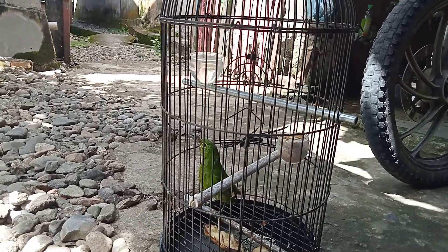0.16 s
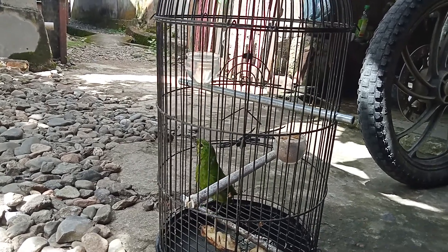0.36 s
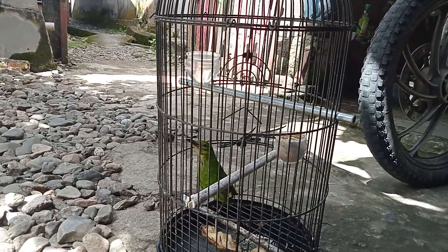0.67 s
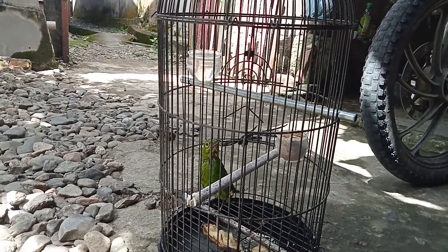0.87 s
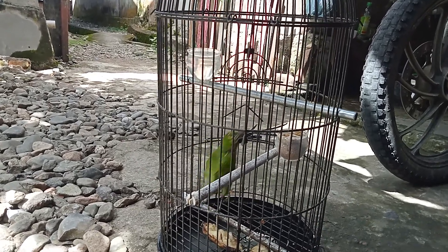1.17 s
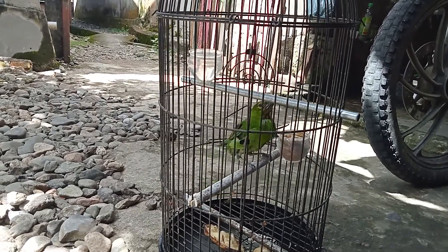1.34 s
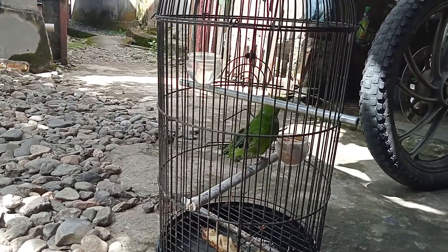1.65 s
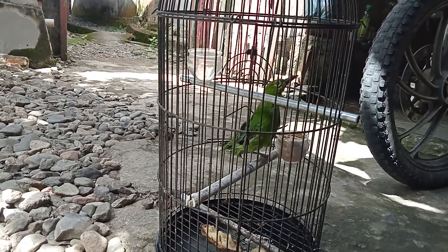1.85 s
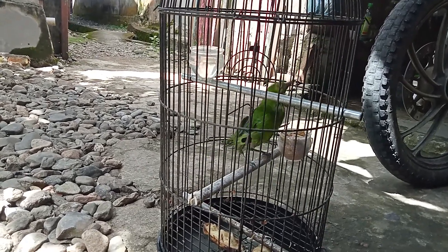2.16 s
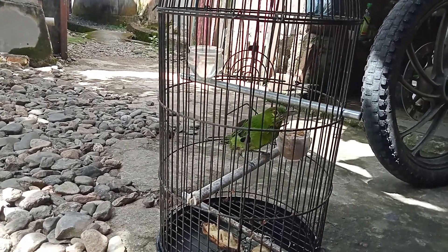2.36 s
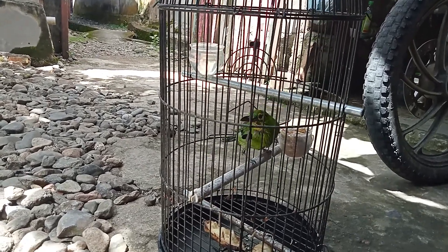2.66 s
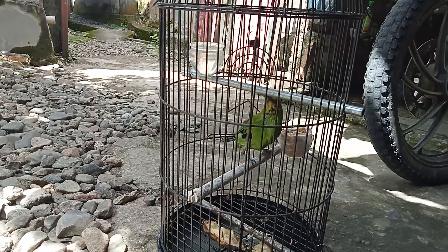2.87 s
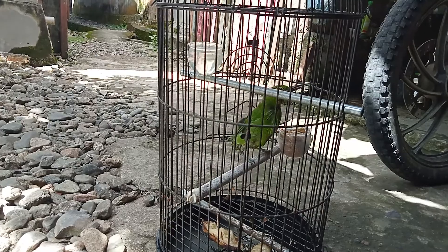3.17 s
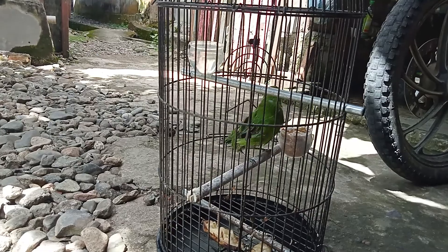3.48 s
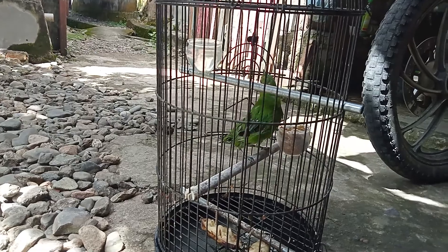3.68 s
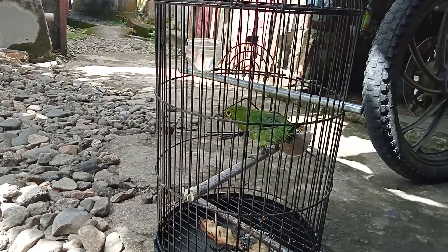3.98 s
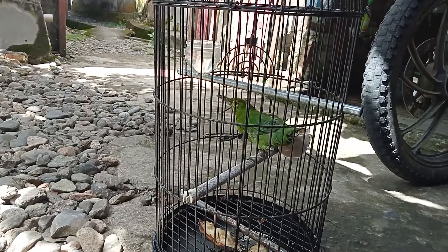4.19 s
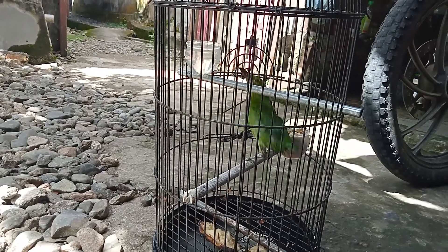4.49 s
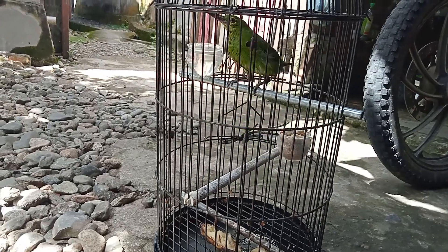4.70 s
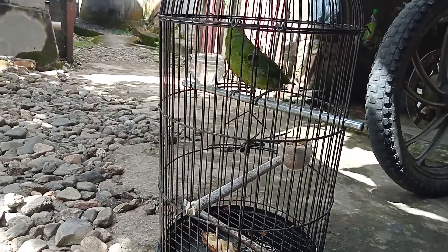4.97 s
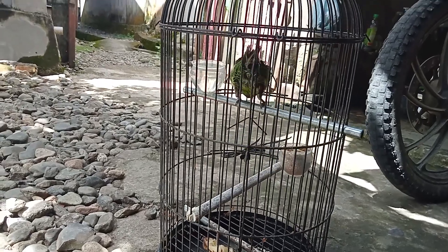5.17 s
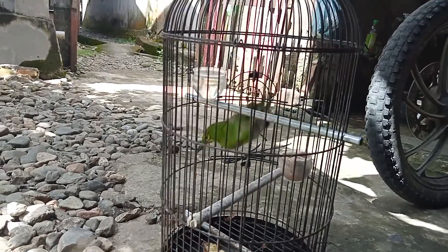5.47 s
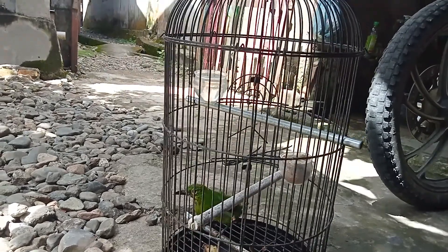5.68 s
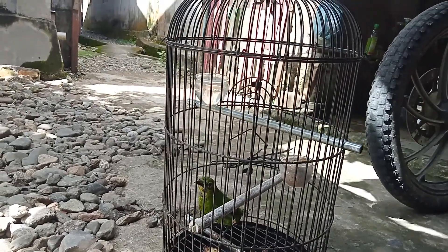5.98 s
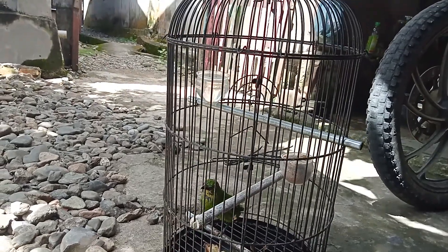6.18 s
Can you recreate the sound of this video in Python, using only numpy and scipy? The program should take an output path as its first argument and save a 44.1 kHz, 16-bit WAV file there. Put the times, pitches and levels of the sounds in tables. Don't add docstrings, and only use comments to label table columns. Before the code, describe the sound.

Bright, busy birdsong close to one microphone: whistles and hard falling chips first, a gap filled by a more distant bird's upward notes, then accelerating-sounding buzzes, thin climbing whistles, raspy notes and more sweet whistles, thinning at the end. Stones, walls and cage wires add a short shimmering echo. A soft steady outdoor wash, distant motor hum and high insect hiss stay far underneath.

```python
import sys
import numpy as np
from scipy import signal
from scipy.fft import rfft, irfft
from scipy.io import wavfile
from scipy.ndimage import uniform_filter1d, minimum_filter1d

SR = 44100
rng = np.random.default_rng(int(sys.argv[2]) if len(sys.argv) > 2 else 0)


def nominal_scale(level):
    x = np.asarray(level, float) / 20
    return 10 ** x


def store_wav(level_fs):
    pcm = np.round(np.clip(np.atleast_2d(level_fs), -1, 1) * 32767)
    wavfile.write(sys.argv[1], SR, pcm.T.astype(np.int16))


N = 279594

# t/s, length/s, low voice top f/Hz, high voice top f/Hz, level/dB
BUZZES = [
    (2.138, 0.085, 2395, 3710, -14.5),
    (2.223, 0.092, 2470, 3400, -12.5),
    (2.355, 0.073, 2414, 3262, -8),
    (2.461, 0.072, 2437, 3472, -10),
    (2.578, .067, 2554, 3542, -10),
    (2.699, 0.064, 2488, 3357, -5),
]
# f/Hz, level/dB
BEAK_COLOUR = [(1000, -18.5), (1500, -14), (1900, -8), (2130, 0), (2400, -13.5), (3100, -0.7), (4400, -6.5),
               (5900, 0), (7300, -4.5), (9000, 7.5), (10500, -9.5), (15000, -22)]
# f/Hz, level/dB
ECHO_COLOUR = [(900, -28.5), (1750, -17.5), (2100, 0.5), (2500, 0.5), (3200, 0.4), (4000, 2), (4600, -7),
               (5900, 7), (7000, -12), (10000, -35.5), (15000, -40)]
BLUR_HZ = 500


def rms_one(x):
    return x / np.sqrt(np.mean(x ** 2) + 1e-20)


def at_hz(points, hz):
    points_hz, points_db = np.transpose(points)
    return np.interp(np.log(np.abs(hz) + 1), np.log(points_hz), points_db)


def coloured(white, points):
    gain = nominal_scale(at_hz(points, np.fft.rfftfreq(len(white), 1 / SR)))
    return irfft(rfft(white) * gain, len(white))


def resonance(x, hz, width_hz):
    r = np.exp(-np.pi * width_hz / SR)
    poles = [1, -2 * r * np.cos(2 * np.pi * hz / SR), r * r]
    return signal.lfilter([(1 - r * r) / 2, 0, (r * r - 1) / 2], poles, x)


def drift(rate_hz):
    r = np.exp(-2 * np.pi * rate_hz / SR)
    slow = signal.lfilter([1], [1, -2 * r, r * r], rng.standard_normal(N + SR))
    return rms_one(slow[SR:])


def breath_blur(share):
    return 1 - share + share * drift(BLUR_HZ)


def note_curves(rows, edge_s):
    s, *columns = np.transpose(rows)
    at = np.arange(max(round(s.min() * SR), 0), min(round(s.max() * SR), N))
    gate = np.clip(np.minimum(at - at[0], at[-1] - at) / (edge_s * SR), 0, 1)
    return at, np.sin(np.pi / 2 * gate) ** 2, [np.interp(at / SR, s, c) for c in columns]


def turns(hz):
    return 2 * np.pi * np.cumsum(hz) / SR


def yard_noise():
    # f/Hz, level/dB
    wash_colour = [(30, -26), (60, -23.5), (90, -19.5), (200, -4.5), (450, -7), (1000, -2), (2300, 1.5),
                   (3300, 3), (4500, -10), (7500, -10.5), (10500, -16.5), (12000, -22.5), (15500, -39)]
    return nominal_scale(-43) * rms_one(coloured(rng.standard_normal(N), wash_colour))


def hum():
    # f/Hz, width/Hz, level/dB
    motor_lines = [(98.7, 13, -64.5), (148.9, 7.8, -59), (195.9, 23, -60.5), (355.8, 15, -66),
                   (399, 20, -67.5), (634, 78, -49.5)]
    white = rng.standard_normal(N)
    out = np.zeros(N)
    for hz, width_hz, db in motor_lines:
        line = resonance(resonance(white, hz, width_hz), hz, width_hz)
        out += nominal_scale(db) * rms_one(line)
    return out


def insects():
    # t/s, length/s, level/dB
    swells = [
        (-.05, 0.16, 11.5),
        (1.628, 0.1, 11.5),
        (1.775, 0.11, 9.5),
        (1.914, 0.15, 14),
        (6.052, 0.48, 6),
    ]
    centre_hz, band_hz, throb_hz, chorus_db = 5950, 1250, 230, -42
    t = np.arange(N) / SR
    swell_db = sum(db * np.sin(np.pi * np.clip((t - s) / length, 0, 1)) ** .5 for s, length, db in swells)
    throb = 1 + 0.13 * rms_one(resonance(rng.standard_normal(N), throb_hz, 120))
    limits_hz = [centre_hz - band_hz / 2, centre_hz + band_hz / 2]
    band = signal.butter(2, limits_hz, "band", fs=SR, output="sos")
    hiss = signal.sosfilt(np.vstack([band, band]), throb * rng.standard_normal(N))
    return nominal_scale(chorus_db + swell_db + drift(30)) * rms_one(hiss)


def glides(table, overtones_db, edge, bend, blur, fade_db=0):
    out, breath = np.zeros(N), breath_blur(blur)
    for s, length, start_hz, end_hz, settle_s, db in table:
        at, gate, _ = note_curves([(s, 0), (s + length, 0)], edge_s=edge * length)
        t = (at - at[0]) / SR
        hz = end_hz + (start_hz - end_hz) * np.exp(-(t / settle_s) ** bend)
        for k, part_db in enumerate((0, *overtones_db)):
            part_hz = (k + 1) * hz
            heard = nominal_scale(db + part_db + fade_db * t + at_hz(BEAK_COLOUR, part_hz)) * (part_hz < .45 * SR)
            out[at] += gate * heard * (breath[at] if k else 1) * np.sin((k + 1) * turns(hz))
    return out


def far_bird():
    # t/s, length/s, start f/Hz, end f/Hz,
    # level/dB
    pips = [(0, 0.017, 1586, 2330, -15.5), (1.536, 0.0042, 1960, 2260, -19.5),
            (1.958, 0.026, 3670, 3540, -37), (3.565, 0.022, 1376, 1560, -15),
            (3.76, 0.029, 3017, 2847, -16.5), (4.049, 0.04, 2974, 2864, -18),
            (4.714, 0.03, 2901, 2934, -6.5), (4.904, 0.029, 2893, 2877, -9),
            (4.987, 0.025, 2970, 2900, -16), (5.018, 0.055, 1540, 2268, -20.5),
            (5.09, 0.041, 2244, 2365, -19), (5.28, 0.022, 2480, 2286, -19),
            (5.932, 0.0168, 2205, 2160, -29.5), (6.02, 0.017, 2137, 2150, -46),
            (6.118, 0.021, 2240, 2178, -25), (6.237, 0.018, 2152, 2223, -24.5),
            (6.28, 0.02, 2160, 2130, -39)]
    slides = [
        (.068, .105, 1250, 2114, -5.5),
    ]
    notes = [(s, length, a, b, .014, db) for s, length, a, b, db in pips]
    notes += [(s, length, a, b, length, db) for s, length, a, b, db in slides]
    return glides(notes, (-50, -50), edge=0.14, bend=1, blur=0)


def puffs():
    # t/s, length/s, level/dB
    other_puffs = [(0, 0.043, -39), (0.089, 0.017, -31.5), (0.187, 0.03, -16.5), (0.521, 0.016, -11.5),
                   (0.607, 0.017, -13), (2.107, 0.0084, -32), (2.853, 0.071, -26), (3.044, 0.031, -27.5),
                   (3.247, 0.031, -24), (3.546, 0.017, -23.5), (3.892, 0.02, -29.5),
                   (4.068, 0.0083, -39.5), (5.033, 0.014, -16.5), (5.06, .02, -22.5), (5.356, 0.046, -19),
                   (5.776, 0.024, -25.5)]
    buzz_puffs = [(row[0], 0.0059, -27.5) for row in BUZZES]
    out, air = np.zeros(N), rms_one(coloured(rng.standard_normal(N), ECHO_COLOUR))
    for s, length, db in other_puffs + buzz_puffs:
        at, gate, _ = note_curves([(s, 0), (s + length, 0)], edge_s=0.42 * length)
        out[at] += nominal_scale(db) * gate * air[at]
    return out


def chips():
    # t/s, length/s, start f/Hz, end f/Hz, level/dB
    falling = [
        (.61, 0.031, 4110, 1675, -9),
        (.959, 0.029, 4260, 1630, -3),
        (1.064, 0.035, 3600, 1756, 2),
        (1.254, .027, 4225, 1605, -4),
        (2.114, 0.0043, 6000, 5600, -9.5),
        (5.062, 0.013, 3600, 3040, -18.5),
    ]
    snaps = [
        (.188, 0.023, 7356, 1858, -13.5),
        (.512, 0.036, 7700, 1884, -12),
        (3.257, 0.0067, 6350, 2570, -12.5),
        (3.997, 0.036, 3200, 2656, -10),
        (5.043, 0.026, 4230, 2785, -8.5),
        (5.357, 0.018, 6556, 3090, -7.5),
        (5.778, .034, 4420, 2020, -7.5),
    ]
    chip_overtones_db = (-30.5, -32)
    notes = []
    for table, fall_share in ((falling, .65), (snaps, .35)):
        notes += [(s, length, a, b, fall_share * length, db) for s, length, a, b, db in table]
    tick_lead_s, tick_s, tick_fall_s = 0.01, 0.0065, 0.0092
    for s, length, *_ in BUZZES[1:]:
        notes.append((s + length - tick_lead_s, tick_s, 5150, 2400, tick_fall_s, -16))
    return glides(notes, chip_overtones_db, edge=0.14, bend=1.177, blur=0.97)


def whistles(table, divide, fourth_db, sixth_db):
    out = np.zeros(N)
    wobble, flutter_db, breath = 1 + .004 * drift(150), 3 * drift(40), breath_blur(.2)
    for rows in table:
        at, gate, (hz, first, second, third) = note_curves(rows, edge_s=0.0029)
        levels_db = [first, second, third, second + fourth_db, third - 22, second + sixth_db]
        phase = turns(hz / divide * wobble[at])
        parts = [np.sqrt(2) * nominal_scale(db) * np.sin((k + 1) * phase) for k, db in enumerate(levels_db)]
        out[at] += gate * nominal_scale(flutter_db[at]) * (sum(parts[:2]) + breath[at] * sum(parts[2:]))
    return out


def pure_whistles():
    # t/s, f/Hz
    whistle_paths = [
        [(0.325, 3140), (.342, 3342), (.36, 3258), (.405, 3313), (.435, 3454)],
        [(.727, 3330), (.775, 3380), (.822, 3143), (.86, 3393)],
        [(4.162, 2783), (4.2, 3294), (4.28, 3140)],
        [(4.402, 3046), (4.43, 3263), (4.452, 3052), (4.498, 3240)],
        [(4.6, 3040), (4.65, 2825), (4.676, 2950), (4.7, 2920)],
        [(4.808, 2803), (4.835, 2963), (4.893, 2838)],
        [(5.167, 2893), (5.198, 3010), (5.235, 3134), (5.246, 3355)],
        [(5.498, 2794), (5.512, 2962), (5.545, 2993), (5.597, 3303)],
    ]
    # fundamental level/dB, early 2nd harmonic level/dB
    strengths = [(-9, -33), (-7.5, -50.5), (-9, -23.5), (-9, -22), (-13, -36), (-10.5, -24.5), (-6, -28.5),
                 (-8.5, -28)]
    hold_s, late_db = 0.022, -44
    third_db, third_early_db, third_from = -26.5, -51.5, 0.32
    notes, u = [], np.linspace(0, 1, num=24)
    for rows, (level_db, early_db) in zip(whistle_paths, strengths):
        s, hz = np.transpose(rows)
        t = u * (s[-1] - s[0])
        hz = np.interp(s[0] + t, s, hz)
        first = level_db - 9 * np.exp(-t / .007)
        second = np.interp(t / hold_s, [0, .3, 1, 1.8], [early_db - 4.5, early_db, early_db, late_db])
        third = third_db - 12.5 * u + (third_early_db - third_db) * np.exp(-(u / third_from) ** 5.1)
        notes.append(np.transpose([s[0] + t, hz, first, second, third]))
    return whistles(notes, 0.98, fourth_db=-34, sixth_db=-72)


def second_bird():
    # t/s, length/s, end f/Hz, level/dB
    rising = [(1.545, 0.077, 3102, -7), (1.697, 0.061, 2873, -8.5), (1.851, 0.066, 2935, -6),
              (2.017, .064, 2910, -7.5), (2.186, 0.081, 2970, -20.5), (2.364, .098, 2884, -19.5),
              (2.546, 0.034, 2930, -11.5), (3.791, .071, 2942, -11), (3.956, 0.11, 2833, -15),
              (4.103, 0.047, 3140, -9), (4.27, .085, 2929, -10), (4.428, 0.11, 2980, -13.5),
              (4.593, 0.038, 3050, -11), (4.799, 0.037, 2720, -16), (4.972, .035, 2560, -18),
              (5.002, 0.024, 2250, -15)]
    rise_overtones_db = (-59.5, -36.5)
    start_hz, settle_s = 1330, .0235
    notes = [(s, length, start_hz, hz, settle_s, db) for s, length, hz, db in rising]
    return glides(notes, rise_overtones_db, edge=0.11, bend=2.0, blur=0.33, fade_db=-120)


def two_voices(table, partials_db):
    voice_multiples = [(1, 0), (0, 1), (2, 0), (1, 1), (0, 2), (3, 0), (2, 1), (1, 2), (-1, 2), (0, 3),
                       (3, 1), (2, 2), (4, 1), (3, 2)]
    out, shake, flutter = np.zeros(N), drift(300), drift(510)
    air = rms_one(coloured(rng.standard_normal(N), ECHO_COLOUR))
    hiss = rms_one(coloured(rng.standard_normal(N), BEAK_COLOUR))
    waver, breath = 1 + .012 * drift(60), breath_blur(.5)
    for rows in table:
        at, gate, (low_hz, high_hz, level_db, share_db, rough) = note_curves(rows, edge_s=0.004)
        rough = np.clip(rough, 0, 1)
        low_hz = low_hz * waver[at]
        high_hz = high_hz * waver[at] * (1 + 0.09 * rough * shake[at])
        low, high = turns(low_hz * (1 + 0.032 * rough * flutter[at])), turns(high_hz)
        out[at] += gate * nominal_scale(level_db - 21.5) * air[at]
        out[at] += gate * nominal_scale(level_db - 40) * hiss[at] * (1 + np.cos(high - low)) ** 2
        shaken_db = share_db + 5.1 * rough * np.clip(flutter[at], -2, 2)
        for (m, n), db in zip(voice_multiples, partials_db):
            gain_db = level_db + db + shaken_db * (n > 0) + at_hz(BEAK_COLOUR, m * low_hz + n * high_hz)
            breathy = breath[at] if m * n or m + n > 2 else 1
            out[at] += gate * nominal_scale(gain_db) * breathy * np.sin(m * low + n * high)
    return out


def buzzes():
    buzz_partials_db = [-5, -14, -6.5, -13, -23, -40, -48, -59, -19.5, -80, -43.5, -33.5, -30, -29]
    hook_s, hook_hz, sag_hz_per_s, drop_hz = .011, 306, 3200, 220
    high_hook_hz, high_rest_hz, high_flick_hz = 364, 3200, 100
    share_db, rough = 4, .09
    notes = []
    for s, length, low_hz, high_hz, db in BUZZES:
        sagged_hz = low_hz - sag_hz_per_s * (length - 2 * hook_s)
        rows = [(s, low_hz - hook_hz, high_hz - high_hook_hz, db - 8),
                (s + hook_s, low_hz, high_hz, db),
                (s + length - hook_s, sagged_hz, high_rest_hz, db + 2.5),
                (s + length, sagged_hz - drop_hz, high_rest_hz + high_flick_hz, db - 11.5)]
        notes.append([(*row, share_db, rough) for row in rows])
    return two_voices(notes, buzz_partials_db)


def wire_ticks():
    # t/s, level/dB
    claw_ticks = [
        (2.659, -40),
    ]
    half_s = .002
    out = np.zeros(N)
    for s, db in claw_ticks:
        at, gate, _ = note_curves([(s - half_s, 0), (s + half_s, 0)], edge_s=half_s)
        out[at] += nominal_scale(db) * gate * rng.standard_normal(len(at))
    return signal.sosfilt(signal.butter(4, 9500, "high", fs=SR, output="sos"), out + 1e-18)


def octave_whistles():
    # t/s, length/s, start octave f/Hz, end octave f/Hz, octave level/dB
    climbing = [
        (2.879, 0.068, 4064, 5754, -8),
        (3.06, 0.079, 4020, 5842, -9),
        (3.268, .133, 4160, 5144, -13.5),
    ]
    opening = 0.71
    notes, u = [], np.linspace(0, 1, num=16)
    opened = np.minimum(u / opening, 1)
    one = np.interp(u, [0, opening, 1], [-29, -37, -26])
    two = np.interp(u, [0, opening, 1], [-26, -2.5, 4.5])
    three = np.interp(u, [0, opening, 1], [-36, -49.5, -59])
    for s, length, start_hz, end_hz, db in climbing:
        hz = start_hz + (end_hz - start_hz) * np.sin(np.pi / 2 * opened)
        notes.append(np.transpose([s + u * length, hz, one, two + db * opened, three]))
    return whistles(notes, 2, fourth_db=-44.5, sixth_db=-41.5)


def rasps():
    # t/s, low voice f/Hz, high voice f/Hz, level/dB
    rasp_paths = [
        [(3.563, 1985, 3700, -13.5), (3.595, 2262, 3610, -16.5), (3.64, 2130, 3720, -15.5),
         (3.685, 2146, 3840, -18)],
        [(3.68, 2598, 3160, -11), (3.71, 2884, 3130, -16), (3.742, 2612, 2760, -10)],
        [(3.895, 2232, 2820, -25), (3.925, 1986, 2993, -16.5), (3.957, 2400, 3200, -16),
         (3.99, 2567, 3215, -24)],
    ]
    # high voice share level/dB, roughness [0-1]
    voicings = [
        (-1, 0.7),
        (0.4, .6),
        (8.5, 0.05),
    ]
    rasp_partials_db = [1, 0, -16.5, -16.5, -24.5, -26.5, -41.5, -35, -10.5, -56, -54.5, -44, -50, -37.5]
    notes = [[(*row, *voicing) for row in rows] for rows, voicing in zip(rasp_paths, voicings)]
    return two_voices(notes, rasp_partials_db)


def cage(x):
    centre_hz, spread_hz, t60_s, shimmer_db = 9100, 1800, 0.097, -31
    top = signal.sosfilt(signal.butter(2, 7000, "high", fs=SR, output="sos"), x)
    t = np.arange(SR // 4) / SR
    shimmer = rms_one(resonance(rng.standard_normal(len(t)), centre_hz, spread_hz))
    return signal.fftconvolve(top, shimmer * nominal_scale(shimmer_db - 60 * t / t60_s))[:N]


def yard_echo(x, echo):
    delay_s, db = np.transpose(echo)
    t = np.arange(SR // 2) / SR
    scatter = coloured(rng.standard_normal(len(t)), ECHO_COLOUR)
    scatter = scatter * nominal_scale(np.interp(t, delay_s, db, left=-99, right=-99))
    scatter = scatter * nominal_scale(2.6 * drift(130)[:len(t)])
    return signal.fftconvolve(x, scatter)[:N]


def back_wall(x):
    delay_s, smear_s, wall_db, cut_hz = .134, .012, -7, 1600
    t = np.arange(SR // 2) / SR
    smear = rng.standard_normal(len(t)) * np.exp(-((t - delay_s) / smear_s) ** 2)
    smear = nominal_scale(wall_db) * smear / np.sqrt(np.sum(smear ** 2))
    dull = signal.butter(2, cut_hz, fs=SR, output="sos")
    return signal.sosfilt(dull, signal.fftconvolve(x, smear)[:N])


def held_over(level_db, limit_db, release_db_per_s, smooth):
    fall = release_db_per_s * np.arange(N) / SR
    held = np.maximum.accumulate(level_db + fall) - fall
    return uniform_filter1d(np.maximum(held - limit_db, 0), size=smooth)


def overload_db(song):
    level_db = 10 * np.log10(uniform_filter1d(song ** 2, size=441) + 1e-9)
    return held_over(level_db, -27, 298, smooth=661)


def scene():
    # delay t/s, level/dB per sample
    near_echo = [(.001, -15.5), (.012, -36.5), (.035, -47.5), (.05, -50.5), (0.059, -42), (.09, -48.5),
                 (0.144, -55), (.152, -60.5), (0.3, -69)]
    far_echo = [(.001, -16), (0.033, -31), (.06, -32), (.11, -37.5), (0.138, -40), (.155, -38), (.3, -68.5)]
    near = puffs() + chips() + pure_whistles() + buzzes() + octave_whistles() + rasps()
    rises = second_bird()
    far = far_bird() + rises
    birds = near + far
    echoes = yard_echo(near, near_echo) + yard_echo(far, far_echo) + back_wall(rises)
    song = birds + cage(birds) + nominal_scale(-.25 * overload_db(birds)) * echoes
    over_db = overload_db(song)
    background = nominal_scale(-.3 * over_db) * (yard_noise() + hum()) + nominal_scale(-.8 * over_db) * insects()
    return (song + background + wire_ticks())[None]


def band_limit(x):
    return signal.sosfilt(signal.butter(12, 15670, fs=SR, output="sos"), x)


def record(dry):
    peak_db = 20 * np.log10(-minimum_filter1d(-np.abs(dry[0]), size=265) + 1e-9)
    cut_db = held_over(peak_db, -1.3, 150, smooth=133)
    return band_limit(dry * nominal_scale(-cut_db))


dry = scene()
out = record(dry)
store_wav(out)
```